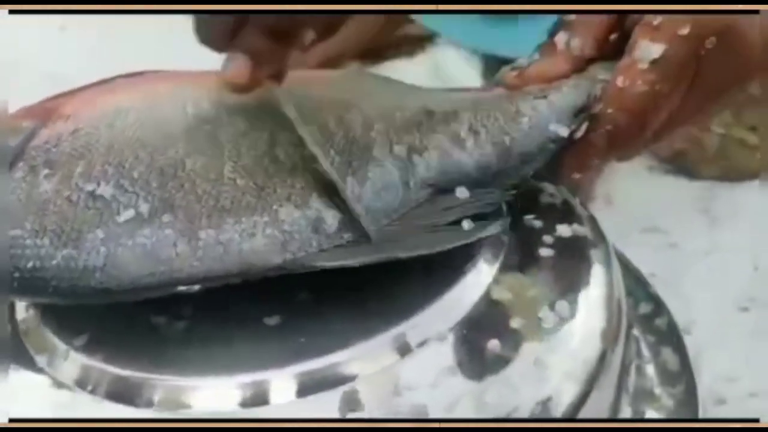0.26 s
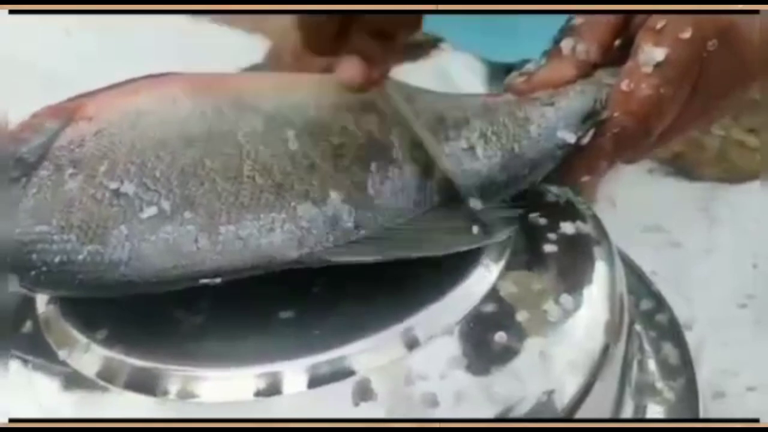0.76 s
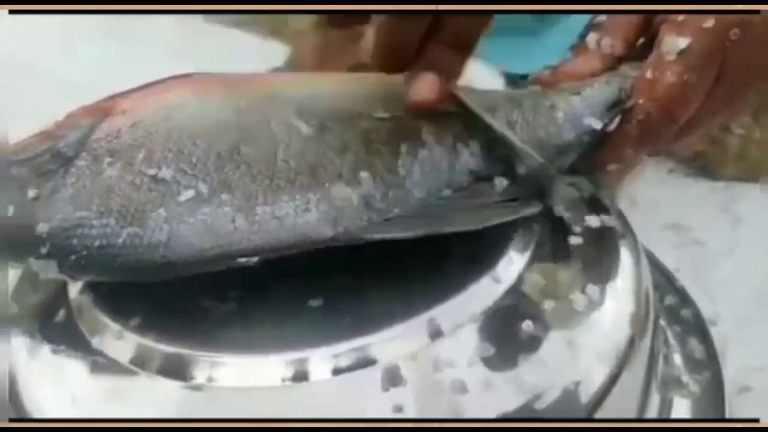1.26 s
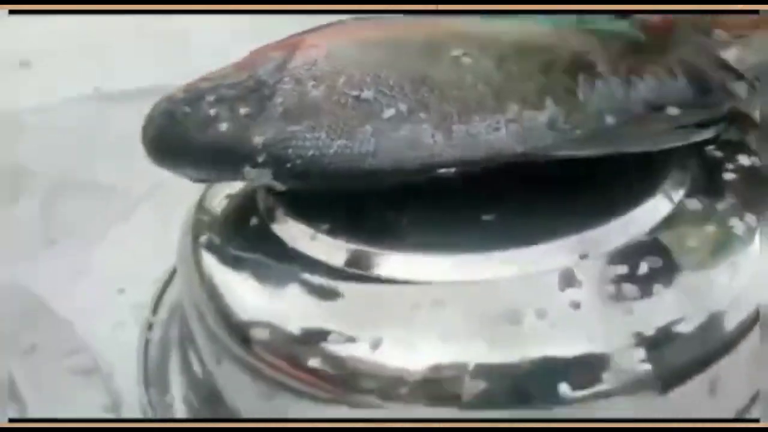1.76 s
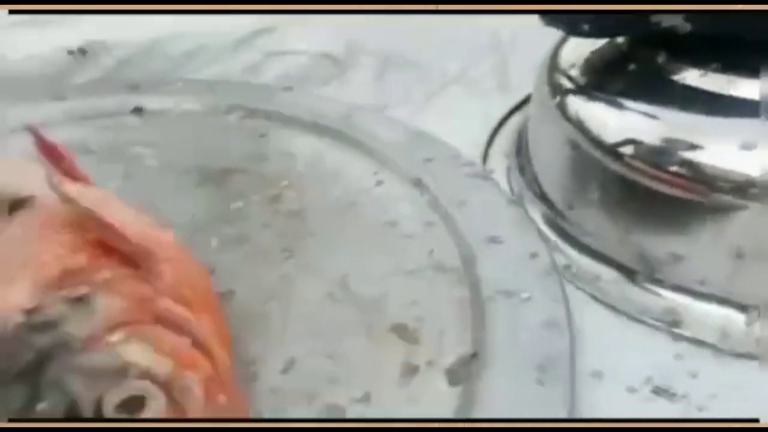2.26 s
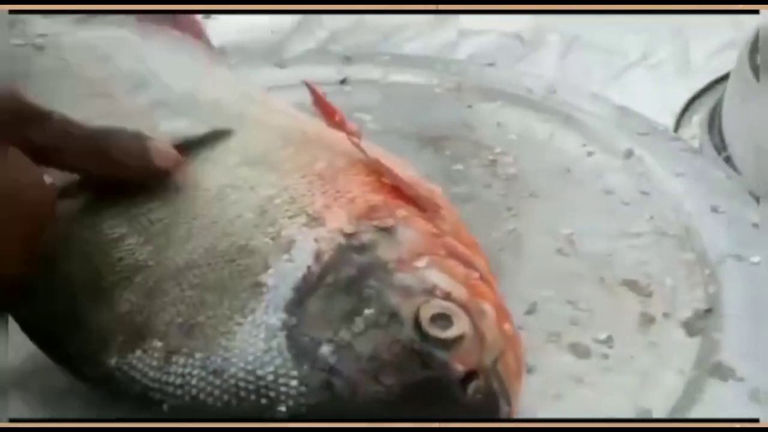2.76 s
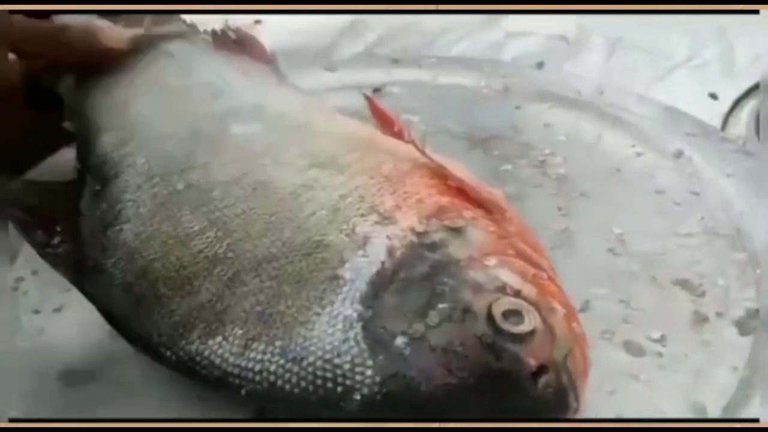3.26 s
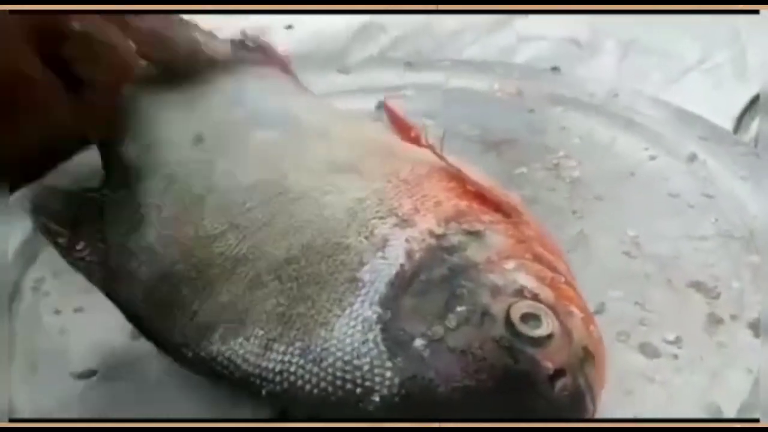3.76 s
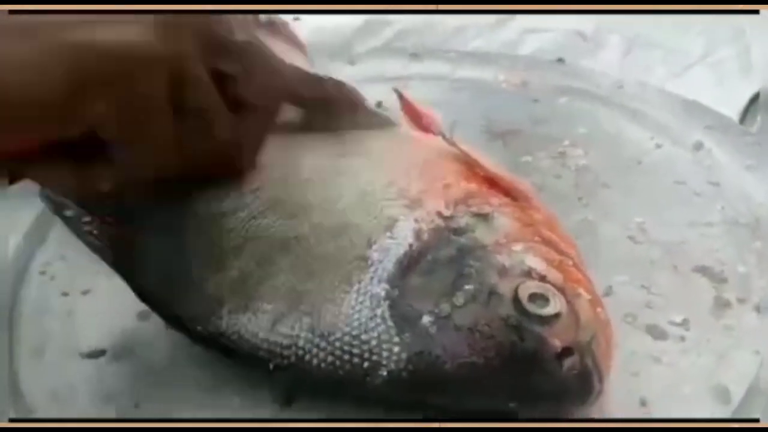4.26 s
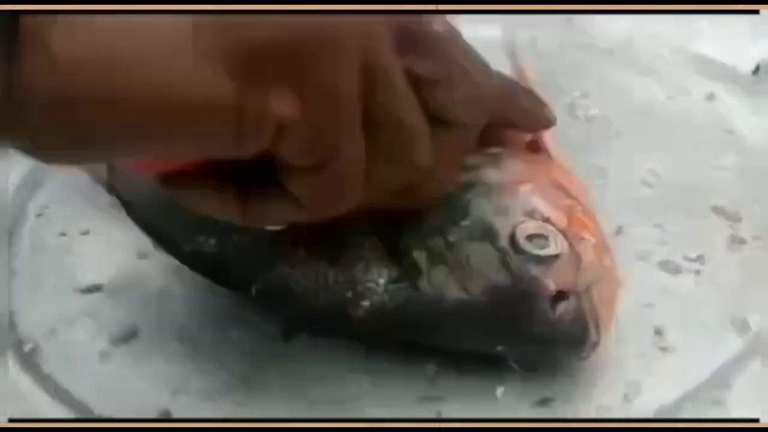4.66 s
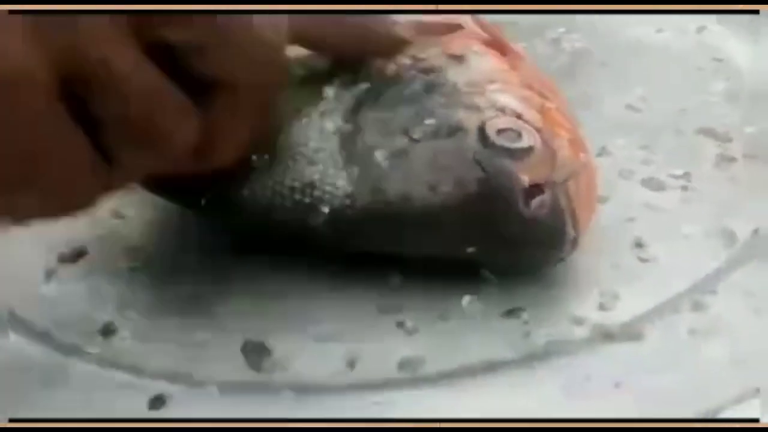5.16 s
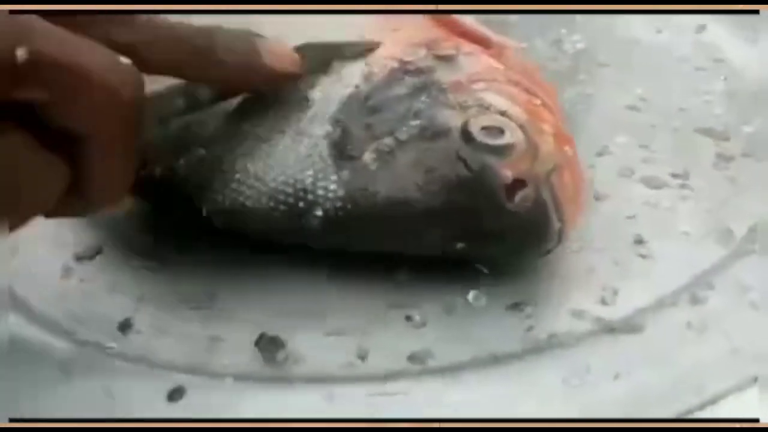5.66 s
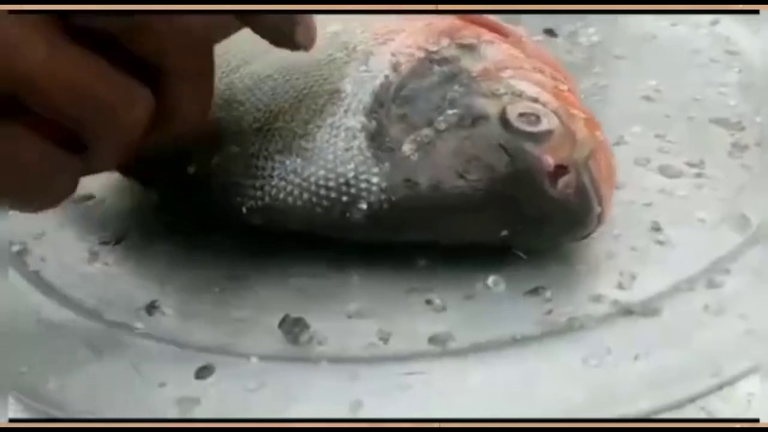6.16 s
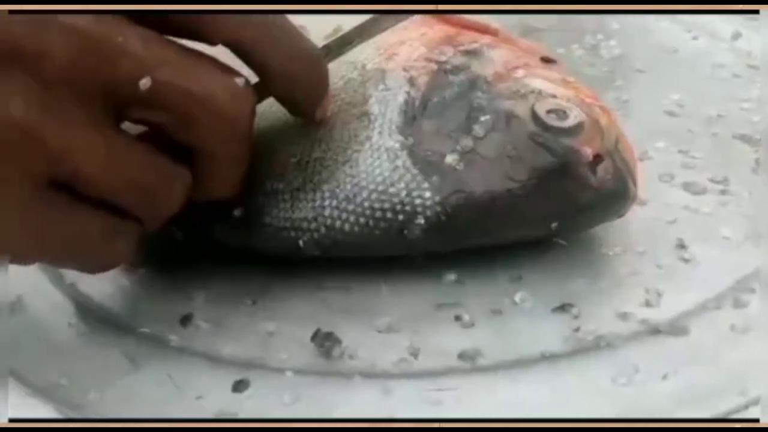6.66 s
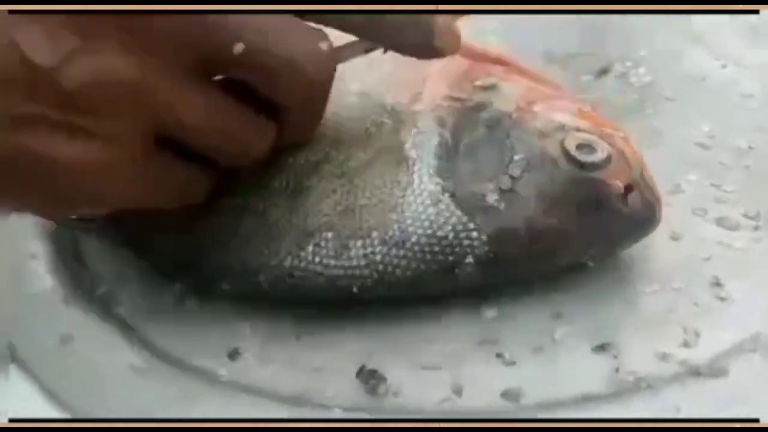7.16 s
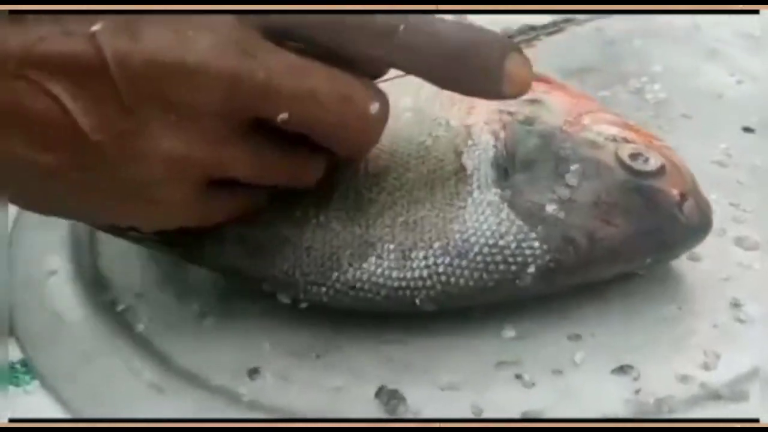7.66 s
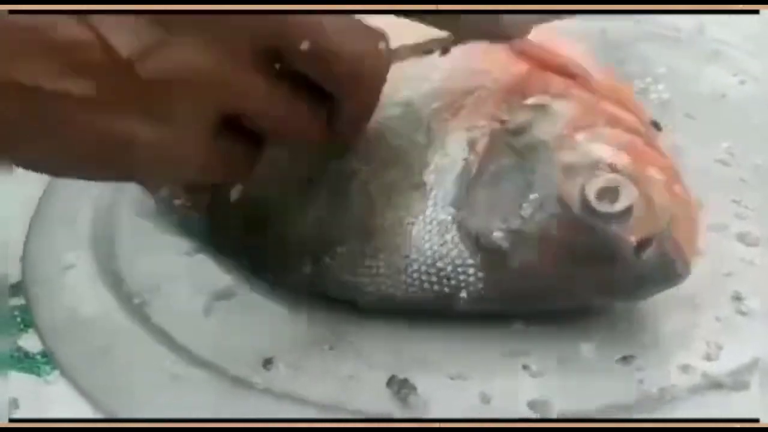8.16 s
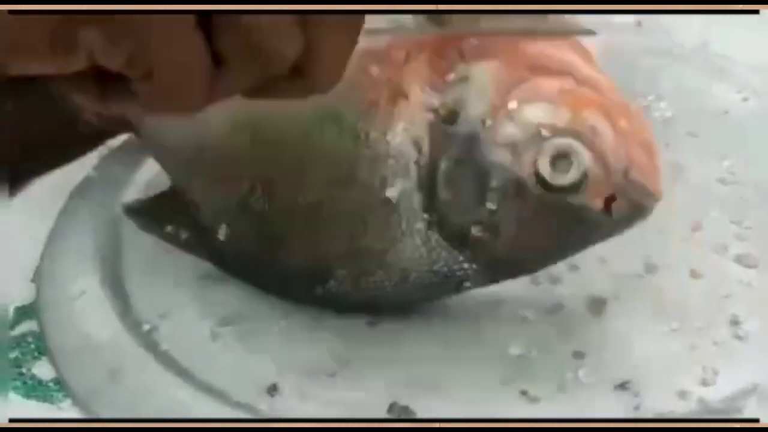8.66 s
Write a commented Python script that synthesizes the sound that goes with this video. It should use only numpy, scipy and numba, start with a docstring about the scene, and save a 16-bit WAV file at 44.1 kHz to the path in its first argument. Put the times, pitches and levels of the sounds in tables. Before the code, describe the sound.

Fast, close scraping of scales off a fish, bright and crackly, with soft fleshy flops, a few metallic tray bumps and air rumble

```python
"""In a kitchen, fish are scaled with knives over a steel tray, close to a hand-held phone with two microphone ports.
Each stroke is a burst of tiny random clicks, coloured as crisp scales, raspy skin and dull flesh.
Stiff scales snap in short bursts of fractures; flesh flops and slime pops as brief gliding sines.
Bumps are a filtered-noise thud with ringing tray modes. Coloured noise gives the air rumble on the ports
and the hush of the kitchen; the near sounds reach the ports at slightly different times."""
import sys
import numpy as np
from scipy import signal
from scipy.fft import rfft, irfft, next_fast_len
from scipy.io import wavfile
from scipy.ndimage import uniform_filter1d, map_coordinates
from numba import njit

SR = 44100
rng = np.random.default_rng(int(sys.argv[2]) if len(sys.argv) > 2 else 0)


def log_audio(samples):
    """Write samples as a 16-bit WAV file to the path given in sys.argv[1]."""
    # one column per channel
    frames = np.atleast_2d(samples).T
    # limit to full scale, then quantise
    limited = np.clip(frames, -1, 1)
    pcm = np.round(limited * 32767).astype(np.int16)
    wavfile.write(sys.argv[1], SR, pcm)


N = 392473

# knife strokes against the scales, levels before the layer trims: start t/s, length/s, crisp level/dB,
# swell from start to end/dB, rasp level of the skin/dB, middle pitch of the scales f/Hz, left minus right/dB
STROKES = [(-0.0, 0.095, -26.5, -25, -45, 7850, -7), (0.221, 0.059, -23.5, -3.5, -39, 7300, -7),
           (0.421, 0.097, -29, 1.5, -45.5, 7300, -3), (0.644, 0.083, -25, -7, -46.5, 7500, -7),
           (0.842, 0.068, -25, 9, -44.5, 7540, -5), (1.065, 0.078, -26, -6.5, -44, 7740, -4),
           (1.27, 0.063, -24, -6, -42, 7050, -5), (1.485, 0.077, -27, 0, -42.5, 7400, -9),
           (1.709, 0.1, -27, 2, -45.5, 7600, -4), (1.925, 0.097, -29, 6, -45, 7000, -4.5),
           (2.174, 0.1, -31, -6, -42.5, 6860, -3), (2.441, 0.09, -26.5, -1.5, -42, 6800, -5.5),
           (2.624, 0.15, -36.5, 6, -51.5, 7200, -1), (2.849, 0.084, -34.5, 0, -49, 7200, 10),
           (3.069, 0.13, -32.5, 9, -46.5, 7400.0, -0.5), (3.313, 0.1, -26.5, 9, -44, 7200, -1.5),
           (3.548, 0.11, -28, 0, -44.5, 7000, 2), (3.794, 0.12, -29.5, -7, -41.5, 6650, 2),
           (3.991, 0.18, -29, 4, -45.5, 7200, -3), (4.322, 0.084, -26, 13, -45, 6740, -1),
           (4.579, 0.09, -28, -5, -42, 6860, -4.5), (4.798, 0.076, -27, 7, -46.5, 6730, -4),
           (5.023, 0.087, -27, 9, -42, 6460, -4.5), (5.257, 0.074, -29.5, 9, -44, 6700, -8),
           (5.516, 0.087, -28.5, -10, -42.5, 6400, -6), (5.798, 0.135, -42, 3, -51, 7350, 2),
           (6.117, 0.076, -35.5, 11, -48.5, 7500, 2), (6.331, 0.1, -46, -3, -56, 7800.0, 1.0),
           (6.569, 0.099, -40.5, -3, -54.5, 7600, 4), (6.922, 0.06, -50.5, 7, -64, 7900, 0),
           (7.159, 0.09, -39.5, 1, -53.5, 8060, 6), (7.401, 0.074, -35.5, 1, -49, 8340, 9),
           (7.629, 0.096, -33.5, -3.5, -48.5, 8300, 6), (7.87, 0.067, -34, -11, -50, 8300.0, 9),
           (8.057, 0.1, -39, 4, -51, 7500.0, 1), (8.253, 0.036, -26.5, -5, -41.5, 7700.0, 6),
           (8.462, 0.16, -33.5, -2.5, -47.5, 7600, 3), (8.755, 0.081, -34.5, 4, -50.5, 8000, 6)]
# how the knife works through the scene, between straight lines: t/s, lead of the right port/ms,
# softness of the flesh/dB, sheen at the top of the treble before trims/dB
KNIFE = [(0, 0.44, 1, 1), (1.5, 0.49, 2.5, -0.5), (2.2, 0.46, -5, 3.5), (2.6, 0.27, -10.5, -2),
         (3.5, 0.25, -10.5, 0), (4.2, 0.35, 0.5, -3), (4.6, 0.14, 2, 1), (5.4, 0.23, 0.5, 0.5),
         (6.2, .3, 4.5, -2.5), (6.9, 0.28, -4.5, 4.5), (7.2, -0.3, -2.5, 1), (8.1, -0.32, -1, 4),
         (8.9, 0.02, -2.5, 4)]
# relative spectrum of the rasping skin: f/Hz, level/dB
RASP = [(600, -6.5), (1100, 0), (1500, -4), (2200, 2), (3200, 0.5), (4500, 2), (6500, 1), (10000, -33.5)]

# the stroke level that counts as firm, and the dB that flesh gains for each dB of stroke level
FIRM_DB, FLESH_SLOPE = -27, 0.2
BRUSH_S = .018  # the blade brushes the scales for this long before it bites


def scraping(crisp_db=-1.5, rasp_db=7.0, sheen_per_grip=0.095, bite_share=0.14):
    """The same clicks sound crisp in the scales, raspy in the skin and dull in the flesh; long strokes bite slower."""
    firm_flesh_db = -44  # before grip and softness
    out, rasp = np.zeros((2, N)), response(RASP)
    for start, length, db, swell, middle, pitch, pan, grip in passes():
        lead, softness, sheen = along(KNIFE, start)
        flesh_db = firm_flesh_db + FLESH_SLOPE * (db - FIRM_DB) + grip + softness
        clicks = mirrored(scale_clicks(length, swell, bite_share * length), length)

        tick = crisp_tick(sheen + sheen_per_grip * grip)
        bright = along_edge(patch_tone(clicks, pitch), tick, pitch, lead, count=3)
        rough = ports(signal.fftconvolve(clicks, rasp), lead, scatter_db=-1, scatter_s=.002)
        dull = ports(flesh_tone(clicks, length), lead, scatter_db=-3.0, scatter_s=0.0034)

        add(out, start - BRUSH_S, place(bright, db + crisp_db, length, pan))
        add(out, start - BRUSH_S, place(rough, middle + rasp_db, length))
        add(out, start - BRUSH_S, place(dull, flesh_db, length))
    return out


def passes():
    """Strokes and returns in order of time, each row followed by its grip on the flesh in dB."""
    # lighter returns of the knife along the scales, levels before the layer trims: start t/s, length/s,
    # crisp level/dB, swell/dB, rasp level/dB, middle pitch f/Hz, left minus right/dB
    return_strokes = [(0.081, 0.11, -34.5, 0, -49, 7700.0, -7), (0.334, 0.06, -30, -13, -47, 7400, -7),
                      (0.543, 0.067, -28.5, -18, -47, 6960, -4), (0.746, 0.066, -28.5, -2, -47.5, 7440, -3),
                      (0.953, 0.063, -26, -10, -42, 7400, -6), (1.162, 0.082, -28, -21, -46, 6850, -4),
                      (1.362, 0.091, -32.5, -9, -49, 6740, -6), (1.585, 0.11, -39, -2, -53.5, 7800, -7),
                      (1.821, 0.11, -40, -17, -55, 7300.0, -2), (2.056, 0.08, -39.5, -2, -54.5, 7550, 1),
                      (2.285, 0.16, -41, -1, -54, 7600, 1), (2.532, 0.097, -39, -5, -65, 7600, 2),
                      (2.784, 0.093, -42, 4, -56, 7400, -3), (2.951, 0.08, -34.5, -21, -51, 7100, -3.5),
                      (3.024, 0.063, -43, 5, -65, 7540, 3), (3.195, 0.09, -43.5, -11, -61, 7900.0, 4),
                      (3.433, 0.071, -39.5, -6, -64, 7900, 3), (3.672, 0.16, -39, -6, -55, 7700, 0),
                      (3.907, 0.18, -39.5, 9, -54, 7660, 7), (4.228, 0.079, -36, -1, -53, 8100, -2),
                      (4.437, 0.098, -35, -11, -54, 6760, 0.0), (4.697, 0.052, -29.5, -3, -41, 7700, 2),
                      (4.897, 0.1, -32, -7, -47.5, 7360, 0), (5.138, 0.11, -34.5, -14, -56, 6600, -3),
                      (5.372, 0.094, -34.5, -10, -55, 6800, -3), (5.677, 0.091, -44, -14, -60, 6900, -2),
                      (6.005, 0.086, -39, 6, -55.5, 7650, 6), (6.255, 0.07, -41.5, 11, -57, 7660, 3.0),
                      (6.48, 0.076, -39.5, 8, -55, 7900, -1), (6.652, 0.039, -50, -12, -69, 7000.0, -10),
                      (6.77, 0.04, -52, 5, -71, 7800, -5), (7.046, 0.056, -50, -13, -73, 7300.0, -2.0),
                      (7.28, 0.1, -53, 4, -64, 7900, 8), (7.512, 0.06, -49, -4, -64, 7200.0, 1),
                      (7.73, 0.08, -52, 3, -73, 7800.0, 12), (7.98, 0.078, -46, 16, -62, 7600.0, -1),
                      (8.185, 0.04, -44, 10, -67, 7900, 2), (8.311, 0.18, -36, -21, -49, 7900, 2),
                      (8.602, 0.12, -45.5, -2, -57, 8140, 5), (8.85, 0.035, -42, -3, -59, 7900, 0)]
    return_grip_db = -4
    firm = [(*row, 0) for row in STROKES]
    light = [(*row, return_grip_db) for row in return_strokes]
    return sorted(firm + light)


def scale_clicks(length, swell_db, attack_s, row_rate=170, row_db=1.0, arch_db=4.5, waver_db=1.56,
                 waver_rate=50, release_s=0.0072, size=12000):
    """Scales flick past the edge one by one, bunched in rows; the pressure swells, arches in mid-stroke and wavers."""
    rate, size_db, brush_db = 2900, 1.5, -9.5  # clicks per second, spread of their size, level of the brush
    t = np.arange(size) / SR - BRUSH_S
    happens = rng.random(size) < rate / SR
    strength = np.minimum(rng.exponential(size=size), 4)
    clicks = happens * undb(size_db * strength) * rng.choice([-1, 1], size)

    brush = undb(brush_db) * np.minimum(1 + t / BRUSH_S, 1)
    release = np.exp(-np.maximum(t - length, 0) / release_s)
    bite = np.maximum(brush, np.minimum(t / attack_s, 1)) * release

    travel = np.clip(t / length, 0, 1)
    pressure_db = swell_db * travel + arch_db * np.sin(np.pi * travel) + waver_db * walk(waver_rate, size)
    return clicks * bite * undb(pressure_db + row_db * walk(row_rate, size))


def mirrored(clicks, length, echo_db=-5.5, delay_s=0.0003673, spread=0.34, closing=0.33):
    """The flat of the blade mirrors the sound; the path shortens as it leans over, so the colour sweeps upward."""
    at = np.arange(len(clicks))
    travel = np.minimum(at / SR / length, 1.5)
    delay = delay_s * np.exp(spread * rng.standard_normal() - closing * travel)
    return clicks + undb(echo_db) * map_coordinates(clicks, [at - delay * SR])


def patch_tone(clicks, hz, ring_db=-0.5, drift_rate=30):
    """The patch of scales under the edge rings together; its pitch wanders as the blade travels."""
    spread, width_hz = .13, 650.
    pitch = hz * np.exp(spread * np.clip(walk(drift_rate, len(clicks)), -1.7, 1.7))
    return clicks + undb(ring_db) * resonate(clicks, pitch, width_hz)


def crisp_tick(sheen_db):
    """The tick of one scale, with more or less sheen at the top."""
    # relative spectrum of a crisp scale: f/Hz, level/dB
    crisp_spectrum = [(2500, -32), (4500, -11.5), (6000, -2.5), (7500, 1), (8600, -0.5), (9400, -7.5),
                      (10000, -12.5), (11500, -12.5), (15500, -17.5)]
    sheen = response([(9000, 0), (11000, sheen_db)])  # the sheen sets in between these frequencies
    return np.convolve(response(crisp_spectrum), sheen)[:512]


def along_edge(clicks, tick, hz, lead_ms, lead_spread_ms=.04, count=4):
    """Scales let go at several spots along the edge, each with its own pitch and its own path to the ports."""
    scatter_s = .0009  # decay time of a scale's reflections
    spot, pair = rng.integers(count, size=len(clicks)), 0
    for k in range(count):
        lead = lead_ms + lead_spread_ms * rng.standard_normal()
        path = ports(scale_tone(tick, hz), lead, 0, scatter_s, size=200)
        pair = pair + signal.oaconvolve((clicks * (spot == k))[None], path, axes=1)
    return pair


def scale_tone(sound, hz, ring_db=-2):
    """A scale rings for a few cycles; its pitch, which depends on its size, is drawn near hz."""
    width_hz, spread = 1700., .15
    pitch = hz * np.exp(spread * np.clip(rng.standard_normal(), -2, 2))
    return sound + undb(ring_db) * resonate(sound, np.full(len(sound), pitch), width_hz)


def flesh_tone(clicks, length, hz=520, spread=0.55, fall=0.56, width_hz=130, ring_db=7):
    """The soft body thuds, and a wet fold ahead of the blade rings lower as it grows."""
    # relative spectrum of the dull flesh: f/Hz, level/dB
    flesh_spectrum = [(60, -53.5), (140, 4), (200, -3.5), (300, -5.5), (500, -9), (900, -4.5), (1400, -2),
                      (2600, -54)]
    sound = signal.fftconvolve(clicks, response(flesh_spectrum))
    travel = np.minimum(np.arange(len(sound)) / SR / length, 2)
    pitch = hz * np.exp(spread * rng.standard_normal() - fall * (travel - .5))
    return sound + undb(ring_db) * resonate(sound, pitch, float(width_hz))


def snapping(crisp_db=-1.0, rasp_db=-1, sheen_db=-1.0, tear_rate=4000, size=400):
    """A stiff scale creaks as it is levered up, then cracks off in quick fractures; a loud one tears for longer."""
    # stiff scales snapping off, before the trims: t/s, crisp level/dB, rasp level/dB, left minus right/dB
    stiff_scales = [(.0582, -38, -46, -9), (.2387, -24, -42, 4), (.2904, -13, -19, 0),
                    (.3136, -34, -37, -4), (.4354, -17, -35.5, -12), (.452, -25, -49, -11),
                    (.505, -29.5, -31.5, 2), (.6487, -21.5, -43, -5), (.6645, -25, -45, -2),
                    (.7214, -22.5, -31.5, -12), (.7697, -22, -49, -12), (.8428, -37, -49, -8),
                    (.862, -16.5, -56, -17), (.9422, -19, -33, -12), (1.0752, -13.5, -38, -13),
                    (1.0785, -19.5, -38, -6), (1.105, -18.5, -25, -4), (1.1405, -41, -32, 0),
                    (1.174, -18, -35, -9), (1.275, -27, -45, -9), (1.2831, -30, -47, 0),
                    (1.3254, -21, -48, -3), (1.3727, -21, -54, -27), (1.4935, -27, -48, -6),
                    (1.5137, -28, -45, -12), (1.7205, -30, -46, -7), (1.732, -29, -44, -5),
                    (1.787, -27, -42, -3), (1.817, -34, -43, -5), (1.9424, -26, -42, -19),
                    (2.2076, -16.5, -26.5, 17), (2.247, -17.5, -24.5, -2), (2.4116, -31, -48, 7),
                    (2.4304, -20, -26.5, 7), (2.4575, -11.5, -34, 17), (2.6397, -28, -40, 12),
                    (2.6493, -23, -39, 10), (2.6725, -22, -36, 13), (2.751, -26.5, -40, -7),
                    (2.884, -21, -42, 2), (3.0926, -24, -51, 17), (3.1095, -20.5, -47, 7),
                    (3.3054, -27, -47, 11), (3.3101, -40, -51, -13), (3.3469, -18.5, -29.5, 13),
                    (3.5749, -20.5, -31.5, 13), (3.6316, -21, -35, -21), (3.722, -37, -49, -1),
                    (3.8052, -23.5, -47, 18), (3.815, -30, -42, 5), (3.8785, -24, -41, -8),
                    (4.0278, -30, -37, 12), (4.158, -27, -46, -4), (4.3995, -40, -37, 0),
                    (4.5327, -33, -43, 2), (4.2433, -25, -38, 16), (4.2591, -31, -36, 9),
                    (4.2686, -26, -31, 7), (4.296, -21, -30.5, 6), (4.4772, -19, -30.5, 8),
                    (4.507, -21.5, -26.5, 1), (4.6874, -13, -28, -17), (5.108, -33, -39, -10),
                    (5.3283, -20.5, -28.5, 2), (5.5315, -20.5, -24.5, -11), (5.585, -26, -34, -1),
                    (5.638, -38, -46, -4), (5.687, -28, -60, -14), (5.7317, -26, -32, 0),
                    (5.9485, -20.5, -27.5, 1), (5.9808, -35, -37, -4), (5.9898, -21, -40, 4),
                    (6.0127, -24, -37, 2), (6.0186, -21, -25.5, -2), (6.128, -34, -32, 0),
                    (6.1613, -24, -29, 17), (6.1747, -22, -35, 3), (6.3718, -33.5, -40, 7),
                    (6.3895, -28, -43, 12), (6.4127, -22, -34, 5), (6.6168, -30.5, -50, 14),
                    (6.6401, -17.5, -32.5, 7), (6.754, -43, -57, 5), (6.822, -43, -55, 2),
                    (6.8605, -40, -45, 1), (7.11, -32, -52, 4), (7.1278, -32, -47, 11),
                    (7.2607, -30, -40, 3), (7.4679, -38, -38, 2), (7.4903, -26.5, -40, 8),
                    (7.9379, -31.5, -57, 10), (7.985, -43, -36.5, -1), (8.044, -27, -38, 13),
                    (8.107, -25, -31.5, 14), (8.1266, -27, -44, 17), (8.1519, -28, -53, 10),
                    (8.2585, -37, -34, 7), (8.2666, -25, -42, 9), (8.5314, -23.5, -24.5, -8),
                    (8.6047, -16, -35, 10), (8.799, -19.5, -35, 3)]
    out, t = np.zeros((2, N)), np.arange(-size, size) / SR
    strain_s, strain_db, span_s = .0014, -12, .005  # span: the time over which levels count
    creak = undb(strain_db) * np.exp(-np.abs(t) / strain_s)
    for s, high, middle, pan in list(stiff_scales) + catches():
        tear_s = np.interp(high, (-34, -22), (.0012, .0028))
        force = np.where(t < 0, creak, np.exp(-np.abs(t) / tear_s))
        crack = (rng.random(len(t)) < tear_rate / SR) * rng.standard_normal(len(t)) * force
        crack[size] = 1.3  # the main fracture

        lead, _, sheen = along(KNIFE, s)
        bright = along_edge(crack, crisp_tick(sheen + sheen_db), 7540, lead, count=2)
        rough = ports(np.convolve(crack, response(RASP)), lead, scatter_db=-3, scatter_s=.002)
        add(out, s + t[0], place(bright, high + crisp_db, span_s, pan))
        add(out, s + t[0], place(rough, middle + rasp_db, span_s))
    return out


def catches(slope=0.43, spread_db=4, pan_spread_db=5):
    """Smaller scales catch on the edge and give way at random along a stroke; columns as for the stiff scales."""
    chance, firm_crisp_db, rasp_over_crisp_db = .75, -38.5, -6.5  # chance for each of five rows of scales
    rows = []
    for start, length, db, *_, pan in STROKES:
        for luck, place_share, strength, side in rng.random((5, 4)):
            if luck < chance:
                crisp = firm_crisp_db + slope * (db - FIRM_DB) + spread_db * (2 * strength - 1)
                side_db = pan + pan_spread_db * (2 * side - 1)
                rows.append((start + place_share * length, crisp, crisp + rasp_over_crisp_db, side_db))
    return rows


def sliding(below_db=-19.0, tick_rate=300, size_db=0.5, patchy_db=5, count=7):
    """The wet blade ticks lightly over loose scales throughout, louder where the passes around are loud."""
    start, _, high = np.transpose(passes())[:3]
    effort = 10 * np.log10(uniform_filter1d(10 ** (high / 10), count))
    strength = np.minimum(rng.exponential(size=N), 4)
    ticks = (rng.random(N) < tick_rate / SR) * rng.choice([-1, 1], N) * undb(size_db * strength)

    tick = crisp_tick(2.5) + undb(-5.0) * response(RASP)
    pair = unit(along_edge(ticks, tick, 6820, 0)[:, :N])
    effort_db = np.interp(np.arange(N) / SR, start, effort)
    return pair * undb(effort_db + below_db + patchy_db * np.minimum(walk(25, N), .5))


def flopping(rise_s=0.0017, decay_s=0.013, sag=0.27, pitch_spread=0.035, size=3000):
    """Flesh and skin spring back in a few heavily damped cycles that sag in pitch."""
    # wet folds of skin slapping back, during or between the strokes: t/s, peak level/dB, middle pitch f/Hz
    slaps = [(.018, -25.5, 215), (1.125, -37, 658), (1.995, -41.5, 580), (3.28, -45, 905),
             (3.325, -39.5, 376), (3.79, -38.5, 387), (4.135, -36.5, 610), (4.385, -35, 620),
             (4.412, -30.5, 222.3), (4.626, -37, 864), (6.312, -39, 243), (7.252, -39.5, 417),
             (8.1, -27.5, 220), (8.795, -31.5, 260)]
    # one flop in each stroke: delay after its start, peak in a firm stroke, middle pitch
    delay_s, firm_peak_db, flop_hz = 0.047, -43, 193
    damping = 0.73  # dB lost per dB of softness, so taut flesh flops harder
    out, t = np.zeros((2, N)), np.arange(size) / SR
    swing = (1 - np.exp(-t / rise_s)) * np.exp(-t / decay_s)
    flops = []
    for start, _, db, *_ in STROKES:
        peak_db = firm_peak_db + FLESH_SLOPE * (db - FIRM_DB) - damping * along(KNIFE, start)[1]
        flops.append((start + delay_s, peak_db, flop_hz * np.exp(pitch_spread * rng.standard_normal())))

    for s, db, hz in flops + list(slaps):
        phase = np.cumsum(hz * (1 + sag * (np.exp(-t / decay_s) - .5))) / SR
        pair = ports(swing * np.sin(2 * np.pi * phase), 0.2, scatter_db=-36, scatter_s=0.0062)
        add(out, s, pair * undb(db) / np.abs(pair).max())
    return out


def squelching(rate=45, db=-51, hz=850, spread=0.596, size=1500):
    """Small pockets of slime pop under the fingers and the blade, as short sines that glide up."""
    out, t = np.zeros((2, N)), np.arange(size) / SR
    cycles, glide, size_db = 1.6, .06, 1.5
    for when, strength, pitch, side in rng.random((int(rate * N / SR), 4)):
        f = hz * np.exp(spread * (4 * pitch - 2))
        age = t * f / cycles
        swell = age * np.exp(1 - 2 * age)
        pop = swell * np.sin(2 * np.pi * f * t * (1 + glide * np.minimum(age, 2)))
        level = db - size_db * np.log(max(1 - strength, np.exp(-3)))
        pair = ports(pop, side - .5, scatter_db=9.0, scatter_s=0.0013)
        add(out, when * N / SR, undb(level) * pair)
    return out


def bumping(rise_s=0.001, thud_db=0, thud_s=0.0087, body_hz=380, size=6000):
    """The body thuds and rings the tray; a longer, softer contact leaves only the lows."""
    # fish and blade bumping the metal: t/s, peak level/dB, contact time/ms
    bumps = [(0.293, -25, 2.2), (2.212, -31.5, 1.7), (2.43, -32, 1.6), (5.531, -11, 0.16),
             (5.553, -19, 0.59), (5.564, -21.5, 1.05), (5.73, -24.5, 0.48), (5.8495, -17, 1.47),
             (5.95, -26, 0.54), (5.986, -32, 0.45), (6.017, -15.5, 0.35), (6.129, -22, 0.091),
             (6.159, -27, 0.28), (6.861, -30, 0.44)]
    # tray modes, damped by the fish lying on it, before scatter and contact: f/Hz, level/dB, t60/s
    tray_modes = [(259, 1, 0.042), (400, 14.5, 0.033), (465, 2, 0.058), (555, 7.5, 0.084),
                  (742, -12, 0.099), (850, -18, 0.058), (1024, -33, 0.072), (1220, 10, 0.051),
                  (1690, -1, 0.024), (1956, 12.5, 0.077), (2406, 21.5, 0.036), (3140, 2, 0.03)]
    out, t = np.zeros((2, N)), np.arange(size) / SR
    freqs = np.fft.rfftfreq(size, 1 / SR)
    for s, db, contact_ms in bumps:
        def cushion(hz):
            return 1 / (1 + (hz * contact_ms / 1000) ** 4)

        detune = 1 + 0.057 * rng.standard_normal()  # the weight of the fish shifts the modes
        ring = np.zeros(size)
        for hz, mode_db, t60 in tray_modes:
            gain = undb(mode_db + 1.5 * rng.standard_normal()) * rng.choice([-1, 1]) * cushion(hz)
            ring += gain * np.sin(2 * np.pi * hz * detune * t) * np.exp(-np.log(1000) * t / t60)

        body = cushion(freqs) * freqs ** 2 / (freqs ** 2 + body_hz ** 2) / np.sqrt(freqs + body_hz)
        thud = irfft(rfft(rng.standard_normal(size)) * body, size) * np.exp(-t / thud_s)
        hit = (unit(ring) + undb(thud_db) * unit(thud)) * np.minimum(t / rise_s, 1)
        pair = ports(hit, 0.17, scatter_db=-7, scatter_s=0.0024)
        add(out, s - rise_s / 2, pair * undb(db) / np.abs(pair).max())
    return out


def draught(air_db=0, eddy_db=3.0):
    """Eddies buffet each port on its own; short gusts swell and fade over a draught that rises and sinks."""
    # changing draught on the ports, before the eddies: t/s, level/dB, left minus right/dB
    drifting_air = [(0, -40, 1), (1.5, -44, -15), (2.2, -55.5, -11), (2.8, -52.5, -12), (3.6, -48.5, -2),
                    (4.1, -61, 5), (4.6, -50, -13), (5.2, -63.5, 1), (6.4, -46, 7), (6.8, -57, 16),
                    (7.1, -42.5, 13), (7.6, -48.5, -2), (8.4, -37.5, -11), (8.9, -43, -24)]
    # gusts, mostly on one port: peak t/s, half width at 1/e of the power/s, level/dB, left minus right/dB
    gusts = [(.03, 0.064, -28.5, -21), (.27, 0.035, -34, 20), (0.544, 0.055, -23.5, -32),
             (.67, 0.026, -32, 12), (1.63, 0.022, -32, -22), (7.825, 0.018, -31.5, -30),
             (7.96, 0.13, -31.5, -26), (8.129, 0.048, -25.5, -14), (8.57, 0.027, -30, -33),
             (8.729, 0.024, -28, -25), (8.855, 0.023, -28.5, -13)]
    # relative spectrum of air on the ports: f/Hz, level/dB
    air_spectrum = [(15, 0.5), (32, 8.5), (80, -.5), (160, -4.5), (260, -10.5), (500, -42), (1500, -96)]
    t = np.arange(N) / SR
    flows = [along(drifting_air, t)]
    for s, width, db, pan in gusts:
        flows.append((db - 10 * np.log10(np.e) * ((t - s) / width) ** 2, np.array([pan])))

    power = 0
    for level, pan in flows:
        sides = undb(np.array([pan, -pan]))  # shares of the power
        power = power + sides / sides.mean(axis=0) * undb(level) ** 2
    eddies = np.array([walk(22, N), walk(22, N)])
    return noise(air_spectrum) * np.sqrt(power) * undb(air_db + eddy_db * eddies)


def kitchen_hush(db=-47.5, waver_db=2.4):
    """The background of the kitchen is coloured noise whose level wavers a little."""
    # relative spectrum of the kitchen: f/Hz, level/dB
    kitchen_spectrum = [(25, 4), (200, -7), (380, -6.5), (620, -19.5), (900, -12), (1400, -17),
                        (2200, -9.5), (4800, -20.5), (7000, -13), (9000, -17.5), (10000, -27), (15000, -28)]
    return noise(kitchen_spectrum) * undb(db + waver_db * walk(10.0, N))


def room(x, wet_db=-23, t60=0.15, gap_s=0.0046, size=20000):
    """A short diffuse tail from the walls, fading in after the direct sound."""
    t = np.arange(size) / SR
    tail = rng.standard_normal((2, size)) * np.exp(-np.log(1000) * t / t60) * np.minimum(t / gap_s, 1)
    colour = response([(200, -1), (2500, 13), (8000, 2), (15000, -30)])
    tail = signal.fftconvolve(tail, colour[None], axes=1)
    tail /= np.linalg.norm(tail, axis=1, keepdims=True)
    return x + undb(wet_db) * signal.fftconvolve(x, tail, axes=1)[:, :N]


def ports(x, lead_ms, scatter_db, scatter_s, size=900):
    """Direct sound with a lag between the ports, then a short spray of reflections off hand and metal."""
    paths = rng.standard_normal((2, size)) * np.exp(-np.arange(size) / SR / scatter_s)
    paths *= undb(scatter_db) / np.linalg.norm(paths, axis=1, keepdims=True)
    lag = int(round(lead_ms * SR / 1000))  # positive: the right port hears it first
    paths[0, max(lag, 0)] += 1
    paths[1, max(-lag, 0)] += 1
    return signal.fftconvolve(x[None], paths, axes=1)


def place(pair, db, seconds, pan_db=0):
    """Give a stereo sound the energy of this rms level held for so long, and set left minus right in dB."""
    pair = pair / (np.linalg.norm(pair, axis=1, keepdims=True) + 1e-12)
    pair = pair * undb([[pan_db / 2], [-pan_db / 2]])
    return pair * undb(db) * np.sqrt(2 * seconds * SR / np.sum(pair ** 2))


def add(out, s, sound):
    """Mix a stereo sound in at time s, or at the very start if s is negative."""
    i = max(int(s * SR), 0)
    out[:, i:i + sound.shape[1]] += sound[:, :max(N - i, 0)]


@njit
def resonate(x, hz, width):
    """State-variable band-pass with a moving centre, gain 1 there."""
    y, band, low = np.empty(len(x)), 0., 0.
    for i in range(len(x)):
        g, k = np.tan(np.pi * hz[i] / SR), width / hz[i]
        v = (band + g * (x[i] - low)) / (1 + g * (g + k))
        band = 2 * v - band
        low = low + 2 * g * v
        y[i] = k * v
    return y


def along(curve, s):
    """The columns of a curve at time s."""
    times, *columns = np.transpose(curve)
    return [np.interp(s, times, column) for column in columns]


def walk(rate, n):
    """Random levels, rate of them per second, joined by straight lines, spread near 1."""
    at = np.arange(n) * rate / SR
    knots = rng.standard_normal(4096)
    return np.sqrt(3 / 2) * np.interp(at, np.arange(len(knots)), knots)


def noise(points):
    """Unrelated coloured noise on both ports, at rms 1."""
    size = next_fast_len(N, True)
    colour = undb(gains(points, np.fft.rfftfreq(size, 1 / SR)))
    return unit(irfft(rfft(rng.standard_normal((2, size))) * colour, size)[:, :N])


def response(points, size=512):
    """Causal (minimum-phase) impulse response with this spectrum, by folding its cepstrum."""
    cepstrum = irfft(np.log(undb(gains(points, np.fft.rfftfreq(size, 1 / SR)))))
    cepstrum[1:size // 2] *= 2
    cepstrum[size // 2 + 1:] = 0
    return irfft(np.exp(rfft(cepstrum)))


def gains(points, hz):
    """A spectrum's dB at the given frequencies, straight lines over log frequency."""
    f, db = np.transpose(points)
    return np.interp(np.log(np.maximum(hz, 1)), np.log(f), db)


def unit(x):
    """Scale to rms 1."""
    return x / np.sqrt(np.mean(x ** 2) + 1e-18)


def undb(db):
    """Decibels to an amplitude factor."""
    return 10 ** (np.asarray(db) / 20)


def scene():
    """The work in its room, with air on the ports and the hush of the kitchen."""
    work = scraping() + snapping() + sliding() + flopping() + squelching() + bumping()
    return room(work) + draught() + kitchen_hush()


def record(dry):
    """Each port's cavity rings in the treble; the loudest peaks are rounded and the top is cut."""
    # port cavities, left then right: f/Hz, width/Hz, boost/dB
    cavities = [(8960, 680, 8), (7900, 610, 7.5)]
    ceiling, top_hz = .95, 15600
    heard = []
    for x, (hz, width, db) in zip(dry, cavities):
        ring = signal.lfilter(*signal.iirpeak(hz, hz / width, fs=SR), x)
        heard.append(x + (undb(db) - 1) * ring)
    rounded = ceiling * np.tanh(np.array(heard) / ceiling)
    return signal.sosfilt(signal.ellip(8, .2, 70, top_hz, fs=SR, output="sos"), rounded)


dry = scene()
out = record(dry)
log_audio(out)
```